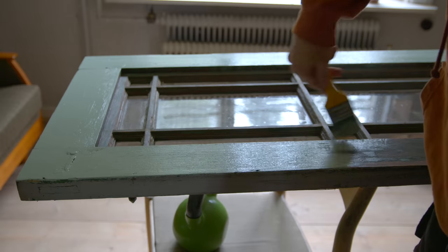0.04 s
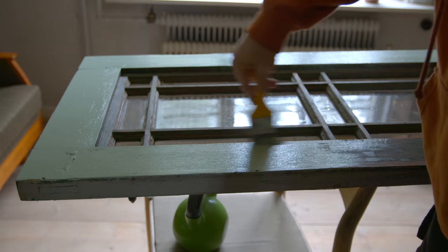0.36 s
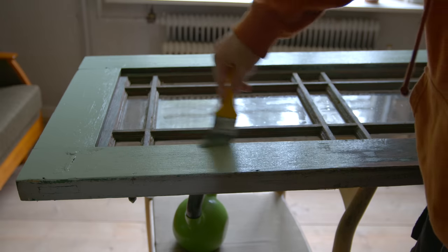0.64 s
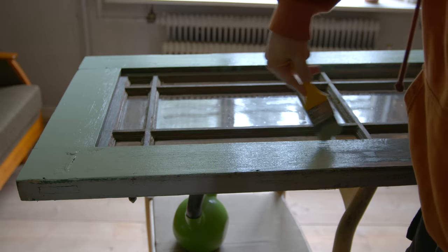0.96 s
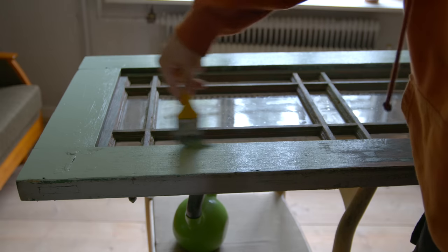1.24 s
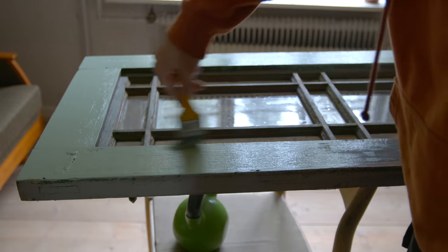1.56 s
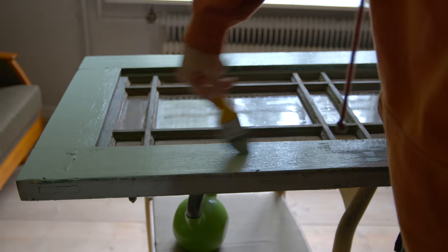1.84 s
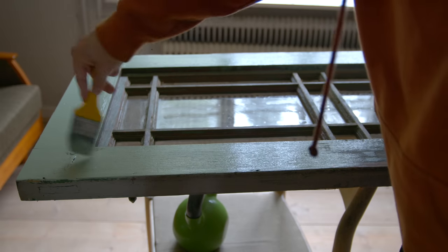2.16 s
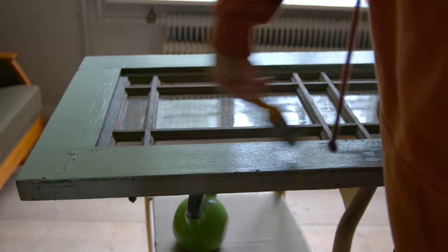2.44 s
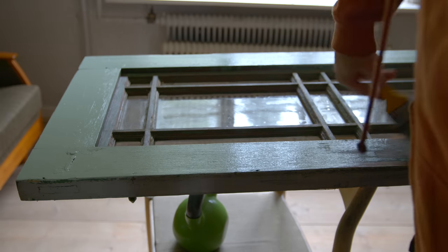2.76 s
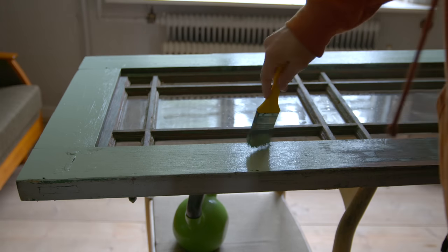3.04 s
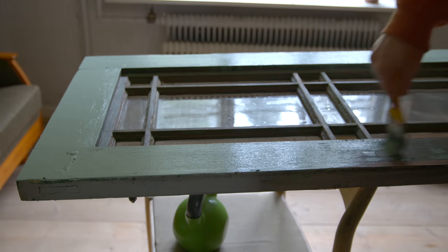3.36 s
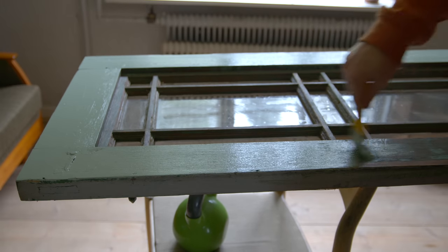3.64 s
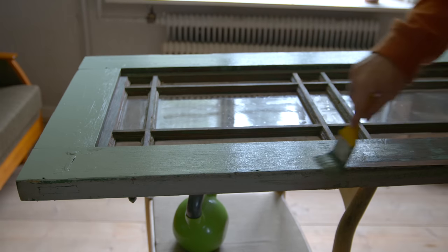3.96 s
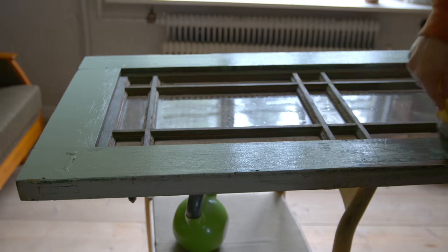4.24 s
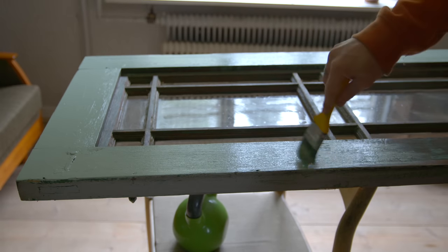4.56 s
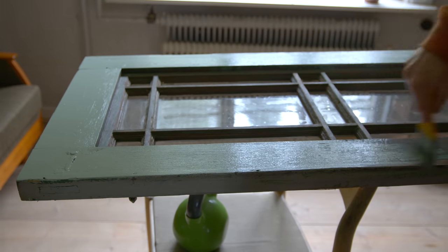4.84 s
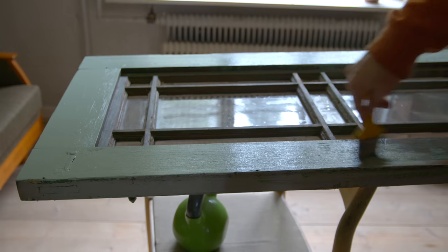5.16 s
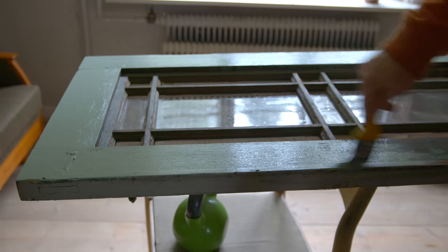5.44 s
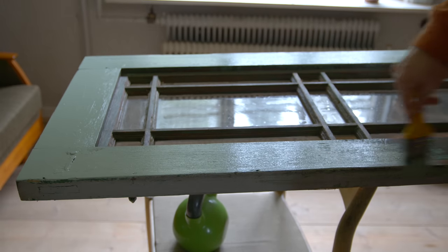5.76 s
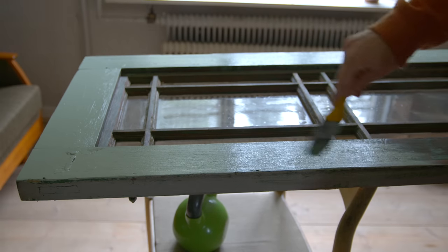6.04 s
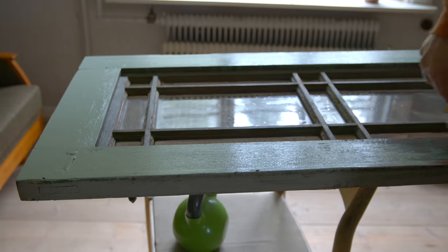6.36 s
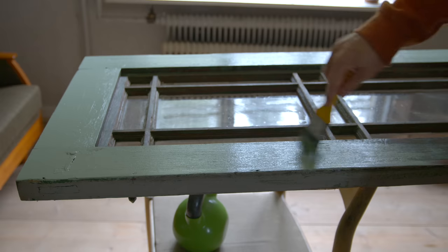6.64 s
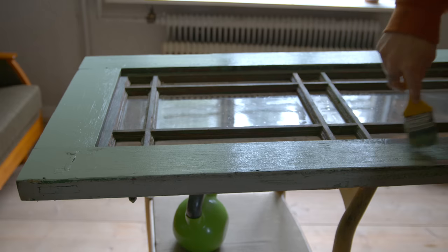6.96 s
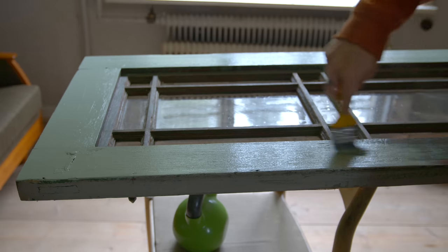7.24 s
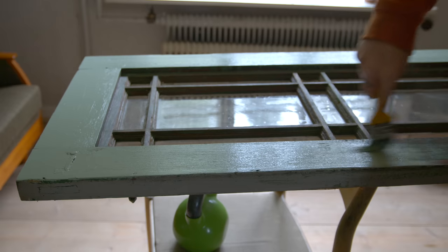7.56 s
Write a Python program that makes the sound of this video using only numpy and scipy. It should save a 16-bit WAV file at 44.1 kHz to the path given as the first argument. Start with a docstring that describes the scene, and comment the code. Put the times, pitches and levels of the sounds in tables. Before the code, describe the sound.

A paintbrush swishes back and forth on a wooden door in a quiet room, with a few light knocks midway.

```python
"""A flat brush lays primer on a glazed wooden door that rests on trestles in a quiet room.
From the start, bristles swish to and fro, hissing and catching on the wood, while the painter's
clothes rustle and the floor sways far below hearing. Near 3 s a step thuds softly in the boards.
Between 4 and 5 s the brush gives the frame its three hardest knocks, which ring in the door.
The strokes carry on to the end, past a few lighter taps and dull thumps."""
import sys
import numpy as np
from scipy import signal
from scipy.fft import rfft, irfft, next_fast_len
from scipy.io import wavfile
from scipy.ndimage import map_coordinates

SR = 44100
rng = np.random.default_rng(int(sys.argv[2]) if len(sys.argv) > 2 else 0)


def wav_record(signal):
    """Record a signal, one row per channel, as 16-bit PCM in the file named by sys.argv[1]."""
    frames = np.transpose(np.atleast_2d(signal))
    bounded = np.clip(frames, -1, 1)
    # unit amplitude maps onto the largest positive 16-bit level
    quanta = np.round(bounded * 32767).astype(np.int16)
    wavfile.write(sys.argv[1], SR, quanta)


N = 343539


def from_db(db):
    """Decibels to amplitude."""
    return 10 ** (np.asarray(db) / 20)


def rms_one(x):
    """Scale a signal to rms 1."""
    return x / np.sqrt(np.mean(x ** 2) + 1e-20)


def curve_at(points, t):
    """Read a breakpoint curve at the times t."""
    return np.interp(t, *np.transpose(points))


def coloured(x, spectrum):
    """Shape a signal with an EQ curve, silent beyond its ends; rms 1."""
    size = next_fast_len(len(x))
    hz, db = np.transpose(spectrum)
    bins = np.maximum(np.fft.rfftfreq(size, 1 / SR), 1)
    gain = from_db(np.interp(np.log(bins), np.log(hz), db, left=-np.inf, right=-np.inf))
    return rms_one(irfft(rfft(x, size) * gain, size)[:len(x)])


def drift(t, per_s):
    """A random wander with a spread near 1."""
    knots = np.arange(t[0], t[-1] + 1, 1 / per_s)
    return np.interp(t, knots, rng.standard_normal(len(knots)))


def resonate(x, hz, width_hz):
    """Ring a signal through one resonance of gain 1."""
    carrier = np.exp(2j * np.pi * np.cumsum(np.full(len(x), hz)) / SR)
    pole = np.exp(-np.pi * width_hz / SR)
    return 2 * np.real(carrier * signal.lfilter([1 - pole], [1, -pole], x / carrier))


def friction(t, slips_per_s, spread_db, grain_db):
    """Countless tiny slips of uneven size, bunched by the grain of the surface; rms 1."""
    slips = rng.random(len(t)) < slips_per_s / SR
    sizes = rng.standard_normal(len(t)) * from_db(spread_db * rng.standard_normal(len(t)))
    return rms_one(slips * sizes * from_db(grain_db * drift(t, per_s=130)))


def resonant_band(t, hz, width_hz):
    """Friction ringing in one steep-sided resonance whose centre may glide; rms 1."""
    slips = friction(t, slips_per_s=15000, spread_db=0.5, grain_db=2.5)
    carrier = np.exp(2j * np.pi * np.cumsum(hz * np.ones(len(t))) / SR)
    skirts = signal.butter(2, width_hz / 2, fs=SR, output="sos")
    return rms_one(np.real(carrier * signal.sosfilt(skirts, slips / carrier)))


def room_tone(air_db=-77.5):
    """Still air with a faint electrical whine of thin, wavering tones."""
    # electrical whine: pitch_hz, level_db
    tones = [(1062, -96), (1195, -94), (1593, -95), (2676, -102)]
    # colour of the air: frequency_hz, gain_db
    air_eq = [(25, 12), (60, 8), (110, 7.5), (170, 3), (300, 2), (400, 2.5), (540, -0.5), (850, -3),
              (1400, -3.5), (2500, -5.5), (6000, -8.5), (10000, -11), (15500, -13)]
    whine = sum(from_db(db) * rms_one(resonate(rng.standard_normal(N), hz, width_hz=3.3))
                for hz, db in tones)
    return from_db(air_db) * coloured(rng.standard_normal(N), air_eq) + whine


def room_reverb(x, t, t60_s=0.3, wall_hz=7000, first_echo_s=0.0084):
    """Diffuse reflections, dulled by the walls."""
    age = t[:SR // 2]
    tail = rng.standard_normal(len(age)) * from_db(-60 * age / t60_s) * (age > first_echo_s)
    tail = signal.sosfilt(signal.butter(1, wall_hz, fs=SR, output="sos"), tail)
    return signal.fftconvolve(x, tail / np.linalg.norm(tail))[:N]


def floor_boards(t, mode_hz=39.08, swell_s=0.058, fade_s=0.049, rumble_db=-82.5):
    """Steps thud in the boards' lowest mode; the floor rumbles and rocks as the painter moves."""
    # weight shifting on the boards: peak_s, level_db
    steps = [(2.41, -72), (2.58, -78), (3.05, -58.5), (3.17, -66), (3.43, -72), (3.71, -71), (4.07, -63.5),
             (4.22, -66.5), (4.87, -68), (5.43, -69), (5.57, -67), (5.8, -73), (6.29, -69.5), (6.93, -77)]
    # colour of the rumble: frequency_hz, gain_db
    rumble_eq = [(22, -16), (32, -1), (42, -3), (52, -6.5), (80, -18.5), (130, -21), (250, -53)]
    # strength of the floor's slow rocking: time_s, level_db
    sway_levels = [(0, -50.5), (.88, -43), (1.8, -53), (2.02, -46), (2.3, -53), (2.47, -38.5),
                   (2.92, -50.5), (3.16, -33.5), (3.5, -40), (4.35, -42), (4.55, -35.5), (5.4, -41.5),
                   (5.62, -36.5), (6.05, -49), (6.68, -51), (6.85, -44.5), (7.8, -43)]
    # colour of the noise that paces the rocking: frequency_hz, gain_db
    sway_eq = [(2, -15), (5, -15), (8, 0.5), (13, -9), (18, -24.5), (28, -42), (50, -79.5)]
    load = np.zeros(N)
    for peak_s, level_db in steps:
        near = slice(round(peak_s * SR) - SR // 4, round(peak_s * SR) + SR // 4)
        width_s = np.where(t[near] < peak_s, swell_s, fade_s)
        load[near] += from_db(level_db) * np.exp(-((t[near] - peak_s) / width_s) ** 2)
    thuds = load * np.sqrt(2) * np.sin(2 * np.pi * (mode_hz * t + rng.random()))
    wander = coloured(rng.standard_normal(N), sway_eq)
    phase = np.angle(signal.hilbert(wander, next_fast_len(N)))[:N]   # wandering pace, even swing
    rocking = signal.sosfilt(signal.butter(6, 17, fs=SR, output="sos"), np.cos(phase))
    rocking = rms_one(rocking * signal.windows.tukey(N, .03))
    sway_db = curve_at(sway_levels, t)
    stir = from_db(rumble_db + 0.35 * (sway_db - sway_db.mean()))   # partly follows the sway
    rumble = np.hypot(stir, from_db(-2) * load) * coloured(rng.standard_normal(N), rumble_eq)
    return thuds + rumble + from_db(sway_db) * rocking


def clothes(t):
    """Soft fabric rubs as the arm and body move."""
    # swell of the rustle: time_s, level_db
    rustle_levels = [(0, -79), (.25, -82.5), (.6, -85), (.85, -81), (1.05, -92), (1.25, -86.5), (1.5, -86),
                     (2.25, -88), (2.45, -80.5), (2.7, -78.5), (2.95, -82.5), (3.1, -83), (4.0, -80),
                     (4.7, -82), (5.1, -83), (5.45, -78.5), (5.85, -83.5), (6.2, -81.5), (7.0, -91),
                     (7.8, -87)]
    # colour of the fabric: frequency_hz, gain_db
    cloth_eq = [(120, -13), (260, 0), (380, 1), (520, -3.5), (850, -2), (1300, -8), (3000, -13.5),
                (8000, -20.5), (15000, -38)]
    rustle = friction(t, slips_per_s=5000, spread_db=2.0, grain_db=0.0)
    return from_db(curve_at(rustle_levels, t)) * coloured(rustle, cloth_eq)


def thumps(t, attack_s=0.0017):
    """Dull low thumps swell and die away; some of them are the body of the door knocks."""
    # low thumps: start_s, level_db, upper_edge_hz, t60_s
    contacts = [(3.021, -74, 109, 0.24), (3.14, -69, 131, 0.16), (3.959, -70, 298, 0.23),
                (4.538, -69.5, 600, 0.22), (4.782, -70, 168, 0.17), (4.9, -70, 600, 0.2),
                (5.12, -74, 200, 0.19), (5.55, -78, 170, 0.18), (6.17, -75, 430, 0.35),
                (6.249, -71, 1000, 0.16), (6.813, -79, 380, 0.47)]
    out = np.zeros(N)
    age = t[:SR // 3]
    attack = 1 - np.exp(-age / attack_s)
    for start_s, level_db, edge_hz, t60_s in contacts:
        band = signal.butter(3, [edge_hz / 3, edge_hz], "band", fs=SR, output="sos")
        thump = rms_one(signal.sosfilt(band, rng.standard_normal(len(age))))
        at = round(start_s * SR)
        out[at:at + len(age)] += from_db(level_db - 60 * age / t60_s) * thump * attack
    return out


def knocks(t, crack_db=7.0, crack_t60_s=0.023, low_edge_hz=233):
    """A crack and a dying rattle ring in the door, each with its own brightness: dull tap to sharp tick."""
    # brush against the frame: start_s, level_db, brightness_hz, t60_s, attack_s
    hits = [(1.101, -73, 1290, 0.05, .001), (1.685, -74, 1000, 0.19, .005),
            (3.754, -68.5, 600, 0.12, 0.0027), (3.948, -73, 1710, 0.15, .002),
            (4.118, -58, 3520, 0.38, 0.0011), (4.24, -72, 1210, 0.054, .001),
            (4.426, -71, 12300, 0.017, .001), (4.538, -59.5, 1690, 0.21, 0.0036),
            (4.897, -59.5, 3530, 0.32, 0.0015), (5.385, -74, 3200, 0.27, .003),
            (5.489, -73, 700, 0.16, .003), (5.575, -72, 800, 0.16, .005), (6.159, -74.5, 3200, 0.12, .001)]
    # modes of the door and brush handle: pitch_hz, width_hz, gain_db
    modes = [(410, 49, 3.5), (680, 70, -4.5), (910, 79, -2.5), (1190, 190, -5.5), (1470, 84, 1.5),
             (1930, 330, -2.5), (2370, 79, 1), (2720, 170, 2), (3370, 340, -1), (4430, 110, 2.5),
             (4920, 140, 1.5), (7340, 1600, 0)]
    out = np.zeros(N)
    age = t[:SR // 3]
    for start_s, level_db, brightness_hz, t60_s, attack_s in hits:
        wood = 0
        for pitch_hz, width_hz, gain_db in modes:   # the rattle reaches each mode in its own way
            rattle = friction(age, slips_per_s=7000, spread_db=1.0, grain_db=-1.5)
            wood = wood + from_db(gain_db) * resonate(rattle, pitch_hz, width_hz)
        band = signal.butter(3, [low_edge_hz, brightness_hz], "band", fs=SR, output="sos")
        wood = rms_one(signal.sosfilt(band, wood))
        attack = 1 - np.exp(-age / attack_s)
        decay = from_db(-60 * age / t60_s) + from_db(crack_db - 60 * age / crack_t60_s)
        at = round(start_s * SR)
        out[at:at + len(age)] += from_db(level_db) * wood * attack * decay
    return out


def off_the_pane(x, t, echo_db=-17, echo_s=0.0016, swing_s=0.0003, hand_hz=1.35):
    """The swish plus its reflection off the glazing, whose delay swings as the hand goes to and fro."""
    delay_s = echo_s + swing_s * np.sin(2 * np.pi * hand_hz * t)
    return x + from_db(echo_db) * map_coordinates(x, [(t - delay_s) * SR], order=2)


def rasps(t):
    """Each catch of the tuft swells and fades in one resonance that may slide as the bristles bend."""
    # the tuft catching on the wood: start_s, length_s, centre_hz (pitch at the middle of the rasp),
    # glide_hz_per_s, peak_db
    catches = [(0.351, 0.15, 2610, -1500, -76), (0.676, 0.086, 2450, 798, -71),
               (0.737, 0.13, 2580, 1500, -73.5), (1.103, 0.19, 2740, -4000, -78.5),
               (1.176, 0.08, 5270, 0, -75), (1.216, 0.14, 2200, -2500, -74),
               (1.545, 0.14, 2370, 4000, -76.5), (1.65, 0.047, 3280, 3000, -75.5),
               (1.981, 0.15, 2350, -2500, -75.5), (2.069, 0.06, 4220, -6000, -78),
               (2.285, 0.12, 2280, -3500, -76.5), (2.281, 0.1, 5350, -5, -80), (2.364, 0.073, 4020, 0, -77),
               (2.907, 0.12, 2190, -2000, -74), (3.174, 0.13, 3080, -3500, -80.5),
               (3.288, 0.087, 1900, 0, -78), (5.201, 0.11, 2430, 0, -75), (6.478, 0.11, 2650, -5000, -78),
               (6.569, 0.16, 1930, 0, -81), (7.187, 0.18, 2020, -1200, -80)]
    out = np.zeros(N)
    for start_s, length_s, centre_hz, glide_hz_per_s, peak_db in catches:
        caught = (t >= start_s) & (t <= start_s + length_s)
        age = t[caught] - start_s
        ring = resonant_band(age, centre_hz + glide_hz_per_s * (age - length_s / 2), width_hz=500)
        out[caught] += from_db(peak_db) * np.sin(np.pi * age / length_s) * ring
    return out


def stroke(age, rise_s, fall_s, level_db, landing_db, rub_db, fine_db,
           whistle_hz, whistle_db, hollow_hz, hollow_db, ring_hz, ring_db, sheen_db):
    """The hand speeds up and slows; bristles rub the wood and hiss through the tuft's resonances."""
    # colour of the rub on the wood: frequency_hz, gain_db
    rub_eq = [(150, -7.5), (380, -4), (700, -5), (1100, -4.5), (1500, -2.5), (2300, -1.5), (3400, -0.5),
              (4100, -5), (5500, -20.5)]
    # colour of the bristle hiss: frequency_hz, gain_db
    hiss_eq = [(2500, -21), (3800, -8.5), (4700, 0), (6200, -1), (7200, 1), (8700, -1), (9500, -8.5),
               (10500, -16), (14000, -38)]
    # colour of the fine, airy top: frequency_hz, gain_db
    fine_eq = [(7500, -23.5), (9400, -3), (10400, -2), (11300, 0), (13400, 1), (14700, 0), (15600, 0),
               (16000, -4)]
    touch_s, lift_s, lift_db = 0.019, 0.053, -16   # the bristles land and leave
    sink_hz_per_s = 1100   # the hollow tone sinks as the tuft bends
    swing = np.interp(age, [0, rise_s, rise_s + fall_s], [-1, 0, 1])
    speed_db = np.where(swing < 0, landing_db, lift_db) * np.abs(swing) ** 1.27   # a rounded arch
    contact = np.clip(np.minimum(age / touch_s, (rise_s + fall_s - age) / lift_s), 0, 1)
    tips = friction(age, slips_per_s=26000, spread_db=0.0, grain_db=1.17)
    drag = friction(age, slips_per_s=12000, spread_db=1.5, grain_db=1.0)
    hollow = resonant_band(age, hollow_hz - sink_hz_per_s * (age - rise_s), width_hz=980)
    # the rub gains on the hiss with speed and eases as the hand lets up
    rub_gain = from_db(rub_db + 0.071 * speed_db - 3.5 * np.maximum(swing, 0))
    rub = rub_gain * rms_one(coloured(drag, rub_eq) + from_db(hollow_db) * hollow)
    pressing = from_db(0.5 * speed_db)   # the tuft whistles most where it is pressed hardest
    whistle = 0.5 * pressing * resonant_band(age, whistle_hz, width_hz=820)
    ring = resonant_band(age, ring_hz, width_hz=1500)
    hiss = rms_one(coloured(tips, hiss_eq) + from_db(whistle_db) * whistle + from_db(ring_db) * ring)
    sheen = rms_one(resonate(drag, hz=12730, width_hz=1500))   # the tuft's highest resonance
    fine = rms_one(coloured(tips, fine_eq) + from_db(sheen_db) * sheen)
    return contact * from_db(level_db + speed_db) * (hiss + rub + from_db(fine_db) * fine)


def brush(t):
    """The brush swishes to and fro, each stroke with its own pace and colour."""
    # brush strokes: start_s, rise_s, fall_s, level_db, landing_db, rub_db, fine_db,
    # whistle_hz, whistle_db, hollow_hz, hollow_db, ring_hz, ring_db, sheen_db
    # (level_db sets the hiss at full speed; the other gains are trims within the stroke)
    strokes = [(-0.063, 0.06, 0.12, -66, -2.0, 3, -4.5, 4100, -16, 2440, -11, 7500, -16, -3),
               (0.227, 0.24, 0.12, -70.5, -13.5, -1.5, -5.5, 4900, -6, 2800, -5, 7700, -4, 0),
               (0.662, 0.19, 0.12, -69, -8, -1, -6, 4950, -3, 2700, -9, 8100, -4.5, -4),
               (1.082, 0.26, 0.15, -73.5, -6.5, 0.4, -4, 5200, 1.5, 2460, -5, 7750, 1, -1),
               (1.493, 0.2, 0.082, -72.5, -6.5, -0.5, -5, 5700.0, -3, 2360, -11, 7700, -6, 0),
               (1.9, 0.2, 0.096, -71.5, -10, -1.5, -6, 4370, 0, 2320, -11, 7750, -2, 3),
               (2.264, 0.16, 0.13, -71.5, -7.5, 0.5, -2, 5100, -3, 2230, -9, 8200, -11, -1),
               (2.868, 0.11, 0.2, -71.5, -12.5, 1.0, -4, 4630, -2, 2170, -8, 7800, -8, -1),
               (3.156, 0.24, 0.19, -71.5, -13.5, -2.5, -3.5, 4650, -11, 1910, -2.5, 7600, -11, -2),
               (3.594, 0.13, 0.14, -69, -12.5, -2, -1, 8600, 0, 1720, -0.5, 7450, -4, 1),
               (3.945, 0.2, 0.15, -68, -16, 0, -2.5, 4600, -7, 2860, -22, 8400, -12, 1),
               (4.414, 0.12, 0.17, -73.5, 1.5, -4, -0.5, 5900, -7, 2400, -4, 8000, -6, 2),
               (4.73, 0.14, 0.21, -71.5, -9.5, -2, -2, 4600, -10, 2700, -15, 7900, -9, 3),
               (5.105, 0.13, 0.18, -71.5, -16, 0.5, -1, 4600, -5, 2470, -10, 7030, -10, 5),
               (5.471, 0.096, 0.17, -70.5, -11.5, 1.5, -1, 4520.0, -3, 2200, -0.5, 7600, -9, 6),
               (5.803, 0.099, 0.12, -63.5, -16.5, 0, -7, 5040, -7, 2960, 0, 8700, -10, -7),
               (6.154, 0.13, 0.16, -68.0, -10.5, -2, -2.5, 4580, -8.0, 1900, -4, 8000, -6, 1),
               (6.472, 0.11, 0.19, -68.5, -14, -3, -1, 4970, -15, 2120, -6, 8300, -4, 1),
               (6.787, 0.16, 0.14, -72.5, -14.5, 1.5, -2.5, 4480.0, -13, 3170, -6, 7800, -13, 1),
               (7.138, 0.16, 0.26, -74.5, -7.5, 1.5, -1, 6760, -8, 1930, -3, 8450, -11, 5),
               (7.489, 0.13, 0.19, -73.5, -13.5, 1.5, -1, 4760, -12, 2300, -7, 8600, -12, 5)]
    out = np.zeros(N)
    for start_s, rise_s, fall_s, *tone in strokes:
        touching = (t >= start_s) & (t <= start_s + rise_s + fall_s)
        out[touching] += stroke(t[touching] - start_s, rise_s, fall_s, *tone)
    return out


def scene():
    """Brush and door with a little reverb, over clothes, low thumps, the floor and the room tone."""
    t = np.arange(N) / SR
    work = off_the_pane(brush(t) + rasps(t), t) + knocks(t)
    low_layers = clothes(t) + thumps(t) + floor_boards(t)
    return (work + from_db(-14) * room_reverb(work, t) + low_layers + room_tone())[None]


def record(dry):
    """A steep low-pass takes off the very top."""
    cutoff_hz = 15700
    return signal.sosfilt(signal.ellip(12, .1, 70, cutoff_hz, fs=SR, output="sos"), dry)


dry = scene()
out = record(dry)
wav_record(out)
```